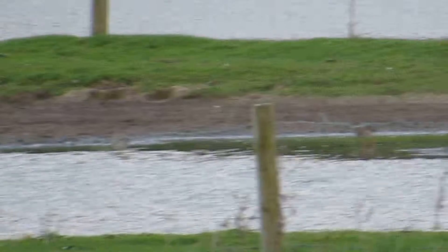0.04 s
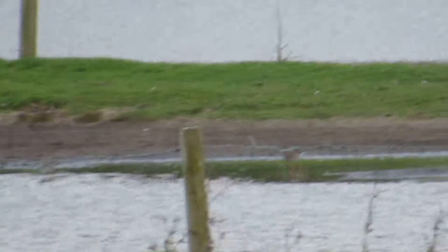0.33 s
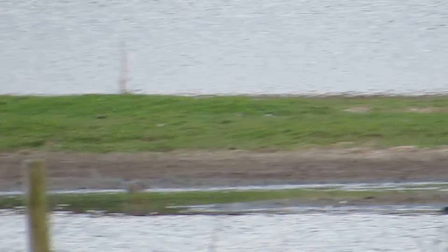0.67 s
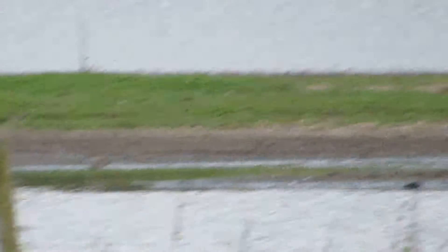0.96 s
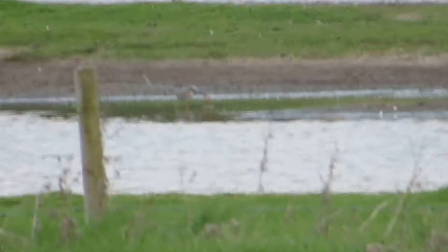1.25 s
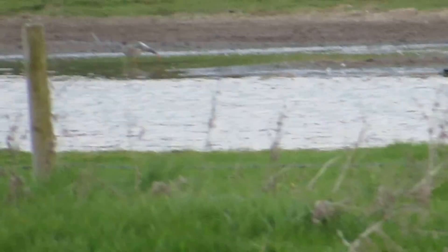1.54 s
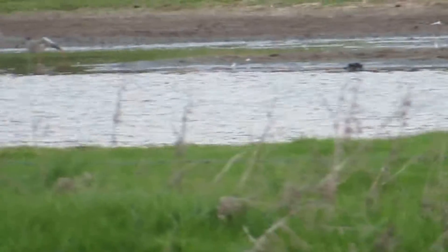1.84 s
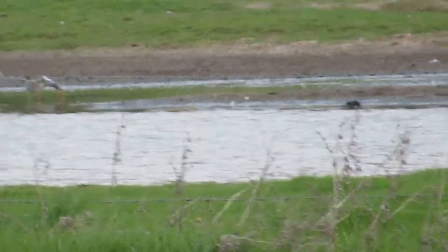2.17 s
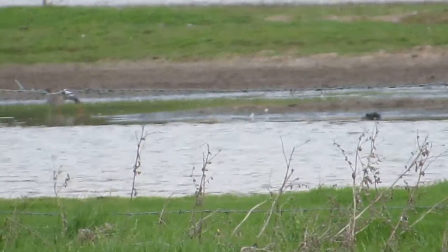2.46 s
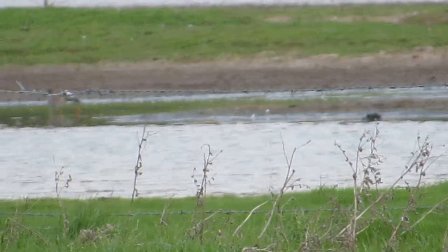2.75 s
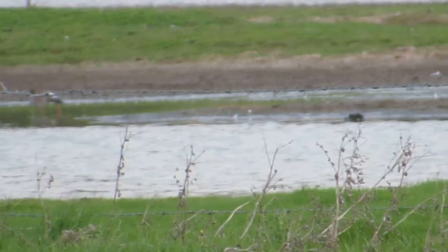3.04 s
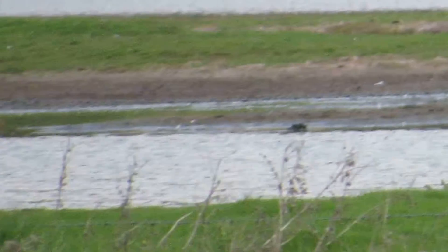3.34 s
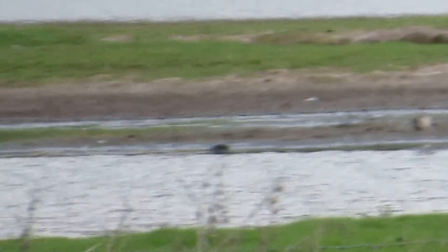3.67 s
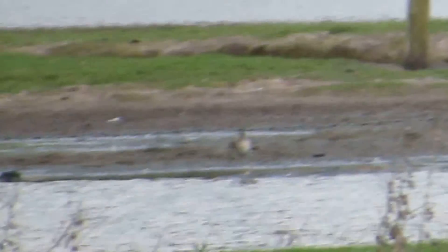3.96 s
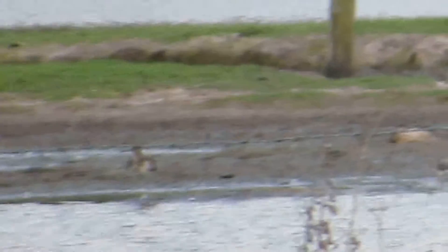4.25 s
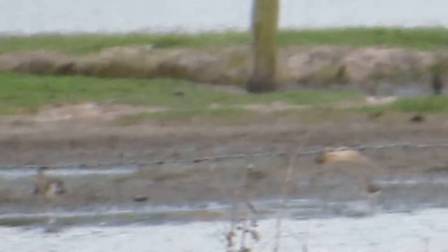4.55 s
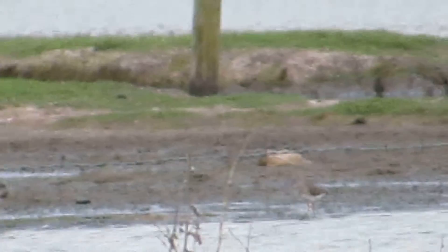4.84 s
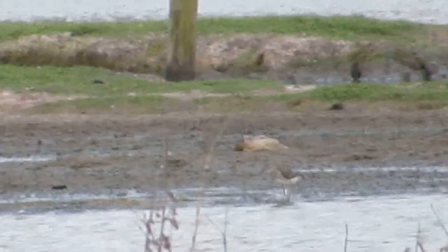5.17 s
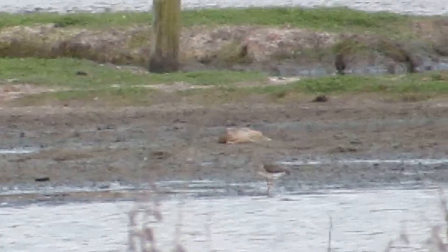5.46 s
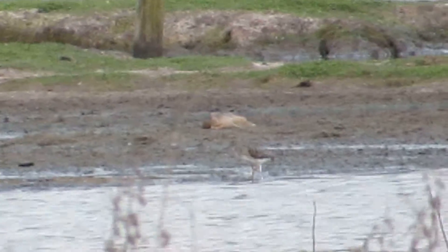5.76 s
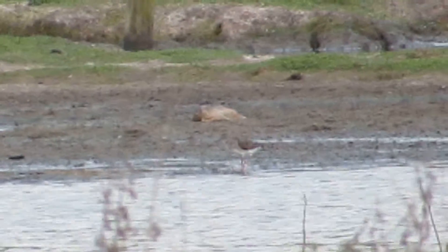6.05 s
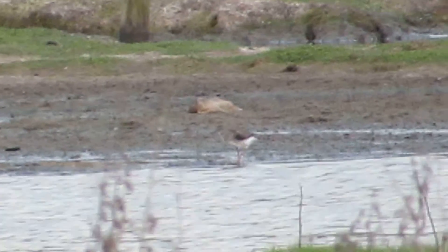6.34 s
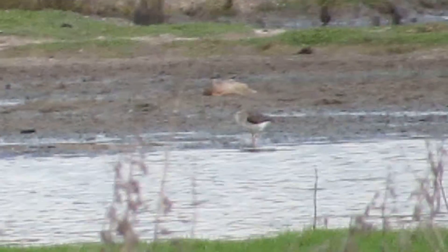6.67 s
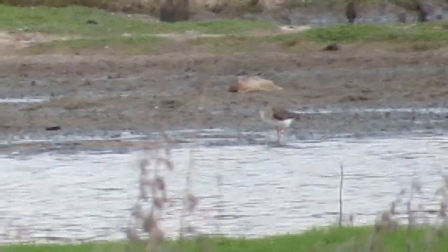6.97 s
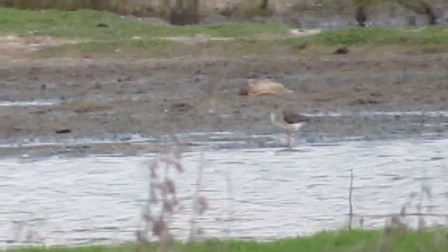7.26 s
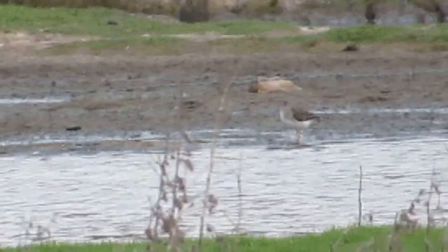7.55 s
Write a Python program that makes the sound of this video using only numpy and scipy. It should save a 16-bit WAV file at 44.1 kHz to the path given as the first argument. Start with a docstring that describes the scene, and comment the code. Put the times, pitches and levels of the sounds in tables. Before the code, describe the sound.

Wind rumbles unevenly on the microphone beside an open marsh pool, over a faint, steady hiss of grass and rippled water. From the start a small distant bird twitters in thin, rapid, high chirps and sliding whistles with a slight echo, busiest during the first two seconds. A soft grass rustle fades within the first second, and a few dry ticks come up to about 1.6 seconds. From 2.3 to 4 seconds the notes are lower and sparser, and scattered faint chirps follow until about 7 seconds. Farther birds chatter very quietly, with a few faint low calls. The wind is the loudest sound, arriving in gusts with small bumps. Hard, low thumps hit the microphone at about 2.3, 3.5 and 4.3 seconds; the background dips after each and swells back. After a calmer stretch, the strongest gusts build from 7 seconds, with another thump near 7.4.

```python
"""A marsh pool in gusty wind. Grass and rippled water hiss, with a brief rustle and a few dry ticks.
A small bird twitters far off in pure gliding tones, echoed by the banks; other birds call more faintly.
Eddies rumble and knock on the microphone, pushing its two channels in opposite directions.
The hardest buffets hit the limiter, and the hiss swells back after each."""
import sys
import numpy as np
from scipy import signal
from scipy.fft import rfft, irfft
from scipy.io import wavfile
from scipy.ndimage import uniform_filter1d, minimum_filter1d

SR = 44100
rng = np.random.default_rng(int(sys.argv[2]) if len(sys.argv) > 2 else 0)


def wav_record(signal):
    """Record a signal, one row per channel, as 16-bit PCM in the file named by sys.argv[1]."""
    frames = np.transpose(np.atleast_2d(signal))
    bounded = np.clip(frames, -1, 1)
    # unit amplitude maps onto the largest positive 16-bit level
    quanta = np.round(bounded * 32767).astype(np.int16)
    wavfile.write(sys.argv[1], SR, quanta)


N = 340011
TIME, HZ = np.arange(N) / SR, np.fft.rfftfreq(N, 1 / SR)


def gain_of(db):
    """dB to amplitude."""
    return 10 ** (np.asarray(db) / 20)


def unit_rms(x):
    """Scale to rms 1."""
    return x / np.sqrt(np.mean(x ** 2) + 1e-20)


def follow(curve):
    """Interpolate (time_s, value) rows at every sample."""
    return np.interp(TIME, *np.transpose(curve))


def add(mix, start_s, sound):
    """Mix a sound in at start_s."""
    part = mix[round(start_s * SR):][:len(sound)]
    part += sound[:len(part)]


def noise(shape):
    """Noise with the given gain per frequency."""
    return irfft(rfft(rng.standard_normal(N)) * shape, N)


def wander(rate_hz):
    """Smooth random drift, rms 1."""
    return unit_rms(noise(np.exp(-(HZ / rate_hz) ** 2)))


def band_noise(centre_hz, width_oct):
    """Bell-shaped noise band, rms 1."""
    return unit_rms(noise(np.exp(-(np.log2((HZ + 1) / centre_hz) / width_oct) ** 2)))


def air(split_hz=4000, treble_depth=0.88, flicker_db=0.88, pan_db=0.54):
    """Wide hiss of grass and rippled water; follows the breeze, the treble a little less."""
    # hiss spectrum: freq_hz, density_db (power per Hz)
    spectrum = [(20, -63.5), (100, -60.5), (250, -71.5), (400, -76.5), (550, -75), (800, -76.5),
                (1200, -83.5), (2000, -89.5), (5000, -96), (7000, -97), (12000, -104.5), (13000, -102),
                (14000, -108)]
    # breeze in the grass: time_s, gain_db
    breeze = [(.06, -3), (.3, -1.5), (1.5, -0.5), (2.1, 1), (2.7, 3.5), (3.3, 2.5), (3.7, 1.5), (4.2, 2),
              (5.0, -0.1), (5.9, 2), (6.7, 3.5), (7.2, 2), (7.65, 0.5)]
    hz, db = np.transpose(spectrum)
    shape = gain_of(np.interp(np.log(HZ + 1), np.log(hz), db)) * np.sqrt(SR / 2)
    low_share = 1 / (1 + (HZ / split_hz) ** 4)
    breeze_db = follow(breeze) + flicker_db * wander(6.2)
    out = np.zeros((2, N))
    for side in out:
        side += noise(shape * np.sqrt(low_share)) * gain_of(breeze_db)
        side += noise(shape * np.sqrt(1 - low_share)) * gain_of(treble_depth * breeze_db)
    return out * gain_of([[pan_db], [-pan_db]])


def rustle(centre_hz=1500, width_oct=0.94):
    """Soft wash of grass at the start, dying away."""
    # rustle envelope: time_s, level_db
    envelope = [(.05, -54.5), (.25, -54), (.45, -54), (.75, -97)]
    return np.array([band_noise(centre_hz, width_oct) for _ in range(2)]) * gain_of(follow(envelope))


def ticks(t60_s=0.041, lowpass_pole=0.86, trim_db=-6):
    """Dry ticks: short, dulled noise bursts."""
    # noise bursts: start_s, level_db (before trim and low-pass)
    bursts = [(.415, -28), (1.071, -29), (1.276, -36), (1.373, -22), (1.455, -20), (1.582, -23),
              (4.132, -37)]
    t, out = TIME[:SR // 20], np.zeros((2, N))
    for start_s, db in bursts:
        for side in out:
            add(side, start_s, gain_of(db + trim_db - 60 * t / t60_s) * rng.standard_normal(len(t)))
    return signal.lfilter([1 - lowpass_pole], [1, -lowpass_pole], out)


def arch(start_s, length_s, top_hz, db, depth_oct=0.31, roundness=1.8, max_skew=0.287):
    """Note that climbs to a top and drops, randomly lopsided: (start_s, track_hz, db)."""
    skew = np.exp(max_skew * rng.uniform(-0.986, 1))
    from_top = 2 * np.linspace(0, 1, int(length_s * SR)) ** skew - 1
    return start_s, top_hz * 2 ** (-depth_oct * abs(from_top) ** roundness), db


def slur(start_s, length_s, from_hz, to_hz, db, time_constants=1.054):
    """Note that slides fast, then settles: (start_s, track_hz, db)."""
    slide = 1 - np.exp(-time_constants * np.linspace(0, 1, int(length_s * SR)))
    return start_s, from_hz + (to_hz - from_hz) * slide / slide[-1], db


def whistles(notes, waver, flutter_db, taper=0.18, best_hz=5540, falloff_db_per_oct2=45):
    """One gliding sine per note, strongest near the voice's best pitch; moving air makes it flutter."""
    out = np.zeros(N)
    detune = 1 + waver * wander(203)
    flutter = gain_of(flutter_db * wander(54))
    for start_s, track_hz, db in notes:
        at = round(start_s * SR)
        span = slice(at, at + len(track_hz))
        hz = track_hz * detune[span]
        voice_gain = gain_of(-falloff_db_per_oct2 * np.minimum(np.log2(hz / best_hz) ** 2, .17))
        tone = np.sin(2 * np.pi * np.cumsum(hz) / SR) * signal.windows.tukey(len(hz), taper)
        add(out, start_s, gain_of(db) * unit_rms(tone * voice_gain * flutter[span]))
    return out


def far_calls():
    """Faint low slurs from across the marsh."""
    # calls: start_s, length_s, from_hz, to_hz, level_db
    calls = [(2.5, .14, 530, 513, -50), (2.88, .28, 531, 507, -51.5), (4.55, .36, 525, 491, -55),
             (6.28, .33, 555, 524, -51)]
    return whistles([slur(*row) for row in calls], waver=0.032, flutter_db=2.0, taper=0.62)


def chatter(notes_per_s=24, glide=0.132, arch_share=0.38):
    """Farther birds string together short random arches and falling slurs."""
    # spells of chatter: start_s, end_s, low_hz, high_hz, level_db
    spells = [(.06, .6, 2900, 6000, -59.5), (.601, 1.855, 3700, 6300, -60), (2.45, 3.3, 3300, 3800, -62.5),
              (3.747, 4.4, 2580, 3500, -61), (5.866, 6.1, 2900, 3850, -62.5), (6.378, 7.0, 2885, 4200, -62)]
    notes = []
    for start_s, end_s, low_hz, high_hz, level_db in spells:
        count = int((end_s - start_s) * notes_per_s) + 1
        for k, (jitter, length, pitch, kind, loudness) in enumerate(rng.random((64, 5))[:count]):
            onset_s = start_s + (k + jitter / 2) / notes_per_s
            length_s = 0.0175 + 0.053 * length
            hz = low_hz + (high_hz - low_hz) * pitch
            db = level_db + 5 * (loudness - .5)
            if kind < arch_share:
                notes.append(arch(onset_s, length_s, hz, db))
            else:
                notes.append(slur(onset_s, length_s, hz * (1 + glide), hz * (1 - glide), db))
    return whistles(notes, waver=0.014, flutter_db=5.0)


def small_bird():
    """Twitter of arched chirps and sliding whistles."""
    # chirps: start_s, length_s, top_hz, level_db
    arches = [(0.072, 0.079, 6800, -63), (0.284, 0.045, 6800, -56), (0.356, 0.11, 3780, -57.5),
              (0.496, 0.04, 5560, -51.5), (0.68, 0.049, 5750, -44.5), (0.739, 0.074, 4590, -57),
              (1.319, 0.064, 6300, -56.5), (1.5, 0.047, 5500, -54), (2.34, 0.088, 3800, -58),
              (2.432, 0.074, 3760, -55.5), (2.662, 0.037, 6390, -57), (2.785, 0.052, 2600, -57),
              (4.638, 0.042, 6100, -63), (2.915, 0.06, 2570, -62), (4.922, 0.05, 2610, -62),
              (5.307, 0.027, 6150, -51)]
    # sliding whistles: start_s, length_s, from_hz, to_hz, level_db
    slurs = [(0.066, 0.026, 5220, 6250, -52.5), (0.115, 0.034, 6420, 5760, -50.5),
             (0.142, 0.0083, 5870, 5200, -47), (0.187, 0.055, 5830, 3510, -48.5),
             (0.272, 0.025, 5050, 6350, -46.5), (0.318, 0.037, 6300, 5270, -58),
             (0.384, 0.037, 6170, 4130, -46.5), (0.386, 0.026, 2400, 2680, -59),
             (0.425, 0.038, 3710, 3023, -57), (0.48, 0.019, 5240, 6100, -48.5),
             (0.522, 0.058, 4610, 3250, -56), (0.887, 0.17, 6080, 5120, -48.5),
             (1.001, 0.059, 2440, 2384, -57), (1.098, 0.024, 5570, 4080, -58),
             (1.121, 0.029, 4020, 5430, -56.5), (1.276, 0.02, 5060, 4400, -55),
             (1.356, 0.057, 2300, 2660, -57.5), (1.548, 0.023, 4980, 5070, -50.5),
             (1.621, .025, 5470, 4900, -52.5), (1.624, .058, 2490, 2410, -60),
             (1.642, 0.06, 3570, 4740, -55), (1.921, 0.057, 6720, 6500, -55.5),
             (1.965, 0.037, 6630, 5000, -54), (2.052, .02, 4650, 4200, -59),
             (2.074, 0.027, 4250, 5550, -58), (2.148, .04, 5300, 4220, -63), (2.39, 0.035, 2740, 2020, -59),
             (2.411, 0.087, 2020, 1890, -55), (2.526, 0.077, 2510, 2180, -54.5),
             (3.302, 0.13, 1750, 2020, -52.5), (3.83, 0.019, 3560, 3520, -55),
             (3.873, 0.03, 3420, 2560, -59), (3.94, 0.058, 3100, 2450, -64),
             (5.285, .035, 4800, 6180, -58.5), (5.922, 0.082, 3830, 2780, -60),
             (6.017, 0.061, 3810, 3070, -61), (6.438, 0.073, 4730, 4900, -59),
             (6.665, .05, 6300, 5030, -61), (6.727, 0.094, 4630, 2870, -62),
             (6.868, 0.036, 6070, 5200, -64)]
    notes = [arch(*row) for row in arches] + [slur(*row) for row in slurs]
    return whistles(notes, waver=0.008, flutter_db=3.2, taper=0.3)


def marsh_reverb(x, tail_db=-9, t60_s=0.4, echo_db=-17):
    """Banks return three early echoes a side; grass scatters a thin tail."""
    t = TIME[:SR // 2]
    response = rng.standard_normal((2, len(t))) * gain_of(-60 * t / t60_s)
    response *= gain_of(tail_db) / np.linalg.norm(response, axis=1, keepdims=True)
    delays_s = rng.uniform(0.0024, 0.023, size=(2, 3))
    np.put_along_axis(response, (delays_s * SR).astype(int), gain_of(echo_db), 1)
    return signal.oaconvolve(x[None], response, axes=1)[:, :N]


def birds(left_db=3.5, right_db=-2.5, right_lag_samples=2, far_send_db=5.0, low_hz=3900):
    """Song arrives from a little to the left; low notes and farther birds carry more echo."""
    song = small_bird()
    far = chatter() + far_calls()
    low_notes = irfft(rfft(song) / (1 + (HZ / low_hz) ** 8), N)
    direct = song - .1 * low_notes + .5 * far
    panned = np.array([gain_of(left_db) * direct, gain_of(right_db) * np.roll(direct, right_lag_samples)])
    return panned + marsh_reverb(song + .5 * low_notes + gain_of(far_send_db) * far)


def wind_strength_db(rise_db_per_s=658, drop_db_per_s=419, puff_s=0.014):
    """Gusts and puffs rise quickly out of the draught, hold and drop back."""
    # underlying light wind, rising and falling between gusts: time_s, strength_db
    draught = [(0, -22.5), (.6, -43), (.97, -38), (1.5, -21), (1.87, -37), (2.5, -33.5), (3.6, -31.5),
               (3.9, -45), (4.2, -63), (4.45, -27), (4.75, -44), (5.05, -27.5), (5.5, -40), (6.6, -40),
               (7, -18.5), (7.7, -18.5)]
    # gusts: start_s, hold_s, strength_db
    gusts = [(.58, 0.13, -23.5), (1.065, 0.14, -15.5), (1.25, 0.125, -14.5), (1.53, .1, -15),
             (1.945, 0.2, -12.5), (2.11, 0.2, -12.5), (2.33, .15, -13.5), (3.42, .05, -15),
             (3.51, .12, -11.5), (4.278, 0.075, -9.5), (5.22, 0.12, -21.5), (5.9, 0.22, -21),
             (6.115, 0.14, -13), (6.89, .08, -12.5), (7.005, .06, -12.5), (7.1, 0.077, -15),
             (7.295, .14, -8), (7.41, 0.13, -7.5), (7.575, 0.058, -6.5), (7.64, 0.081, -11.5)]
    # short puffs: centre_s, strength_db
    puffs = [(0.18, -18.5), (0.442, -19), (0.555, -15), (0.774, -16.5), (0.87, -20.5), (1.801, -17.5),
             (2.541, -19), (2.668, -21.5), (3.243, -17), (3.739, -15), (4.501, -15.5), (4.917, -19),
             (6.38, -22.5), (7.615, -5.5)]
    short_gusts = [(centre_s - puff_s / 2, puff_s, db) for centre_s, db in puffs]
    strength_db = follow(draught)
    for start_s, hold_s, db in list(gusts) + short_gusts:
        rise_db = rise_db_per_s * (TIME - start_s)
        drop_db = drop_db_per_s * (start_s + hold_s - TIME)
        strength_db = np.maximum(strength_db, db + np.minimum(np.minimum(rise_db, drop_db), 0))
    return strength_db


def wind(reference_db=-20, lumps_db=2.5, spurt_db=6.5, right_db=1.95, trim_db=-3.0):
    """Stronger wind sheds smaller eddies, brightening the rumble; these spurt and favour the right."""
    # eddy bands: centre_hz, level_db (at reference_db, before trim), growth_db_per_db, unshared_db
    eddies = [(21.7, -12, 0.93, -23), (57.6, -18.5, 0.6348, -10.5), (101.1, -19.5, 1.17, -12),
              (185.6, -25.5, 1.6867, -12), (332, -39, 2.0541, -9), (630, -64, 2, 0), (1640, -86, 2, -15.5)]
    excess_db = wind_strength_db() - reference_db + lumps_db * wander(43.7)
    spurts = unit_rms(gain_of(spurt_db * np.tanh(wander(84))))
    out = np.zeros((2, N))
    for hz, db, growth, unshared_db in eddies:
        shared, left, right = (band_noise(hz, width_oct=.6) for _ in range(3))
        ports = np.array([shared, -shared]) + gain_of(unshared_db) * np.array([left, right])
        pan = gain_of([[0], [right_db * min(hz / 120, 1)]])
        out += pan * ports * gain_of(db + growth * excess_db + trim_db) * (spurts if hz > 300 else 1)
    return out


def buffets(left_gain=0.67):
    """An eddy strikes the microphone: a pointed pressure swing between two shallow troughs."""
    # eddy strikes: centre_s, right_peak_db, half_width_s
    strikes = [(.559, -4, .0028), (.759, -3, .0026), (.874, -5, .003), (1.073, -3, .0034),
               (1.242, -6, .0014), (1.316, -2, .0018), (1.33, 2, .0017), (1.369, -6, .0014),
               (2.007, -4, .0022), (2.025, -3, .0017), (2.181, -1, .0019), (2.249, -1, .002),
               (2.292, 11.5, .0016), (3.219, -5, .0028), (3.422, -4, .0023), (3.478, 9, .003),
               (3.481, 16, .0022), (3.523, 8, .0036), (3.527, 6.5, .0011), (3.534, 5, .002),
               (3.607, 6.5, .0013), (3.612, 6, .0026), (3.655, -2, .0014), (4.285, -1, .0028),
               (4.295, 2, .0022), (4.306, -2.5, .0005), (4.308, 6, .0014), (4.315, 17.5, .0028),
               (4.336, 4, .0013), (6.188, 4.5, .0032), (6.237, -2, .0015), (6.854, -3, .002),
               (7.015, 0, .0018), (7.056, 3, .002), (7.297, -2, .0013), (7.356, 7, .0018), (7.37, 16, .003),
               (7.575, 4, .0015), (7.599, 6, .0011), (7.614, 6.5, .0008)]
    pressure = np.zeros(N)
    for centre_s, db, half_width_s in strikes:
        reach_s = 12 * half_width_s
        u = np.arange(-reach_s, reach_s, 1 / SR) / half_width_s
        add(pressure, centre_s - reach_s, gain_of(db) * (1 - 3 * u ** 2) / (1 + u ** 2) ** 3)
    return np.array([-left_gain * pressure, pressure])


def scene(start_s=0.055, fade_s=0.0064):
    """Stereo mix; silent until start_s, quick fades at both ends."""
    fades = np.clip(np.minimum(TIME - start_s, TIME[-1] - TIME) / fade_s, 0, 1)
    return (birds() + wind() + buffets() + ticks() + rustle() + air()) * fades


def record(dry, attack_s=0.0018, release_s=1.604, ride_floor_db=-1.5, cutoff_hz=13800):
    """Two narrow notches, fast limiter with slow release, stereo-linked clipper, low-pass."""
    # narrow dips in the sound: centre_hz, width_hz
    notches = [(3950, 210), (7900, 100)]
    for hz, width_hz in notches:
        dry = signal.lfilter(*signal.iirnotch(hz, hz / width_hz, SR), dry)
    cut = 1 - 1 / np.maximum(abs(dry).max(0), 1)
    release = np.exp(-TIME / release_s)
    held_cut = release * np.maximum.accumulate(cut / release)
    pole = np.exp(-1 / (attack_s * SR))
    limited = dry * (1 - signal.lfilter([1 - pole], [1, -pole], held_cut))
    # ease small overshoots down; larger ones clip
    ride = np.maximum(1 / np.maximum(abs(limited).max(0), 1), gain_of(ride_floor_db))
    eased = limited * uniform_filter1d(minimum_filter1d(ride, size=111), size=111)
    clipped = eased / (1 + abs(eased).max(0) ** 20) ** (1 / 20)
    lowpass = signal.firwin(101, cutoff_hz, window=("kaiser", 8), fs=SR)
    return signal.oaconvolve(clipped, lowpass[None], "same")


dry = scene()
out = record(dry)
wav_record(out)
```